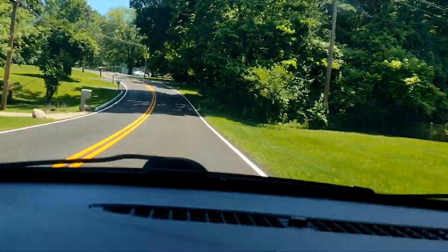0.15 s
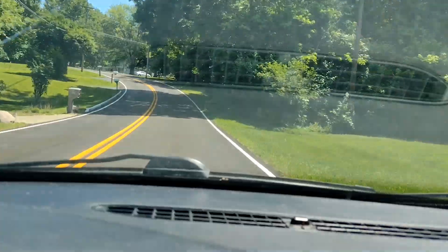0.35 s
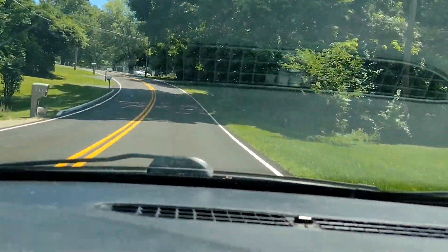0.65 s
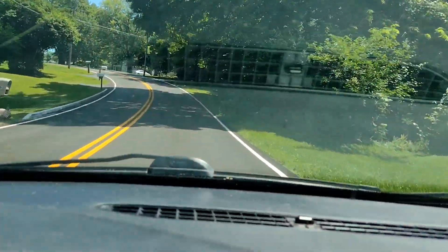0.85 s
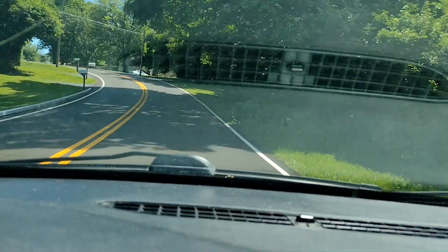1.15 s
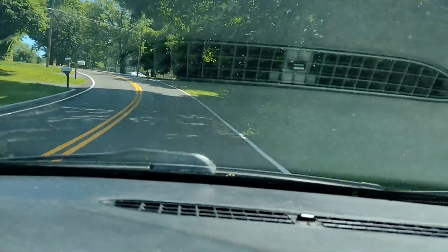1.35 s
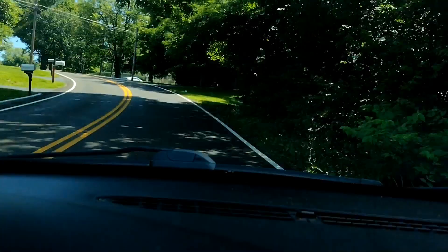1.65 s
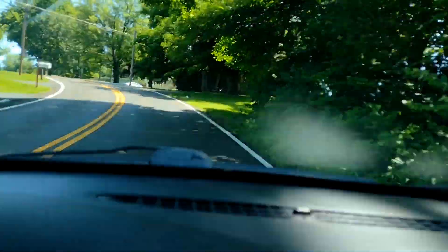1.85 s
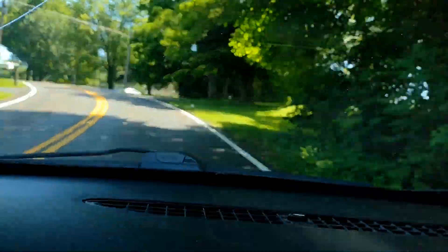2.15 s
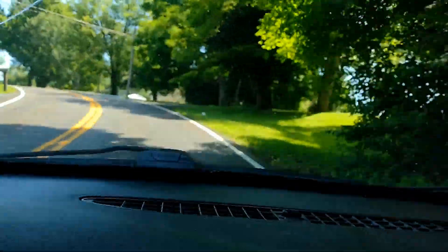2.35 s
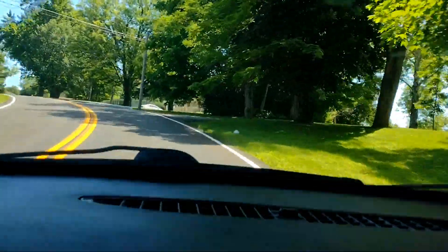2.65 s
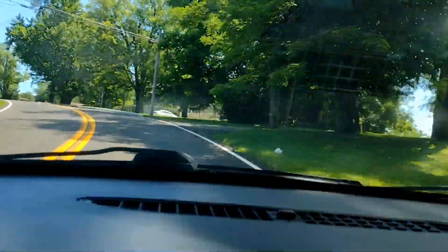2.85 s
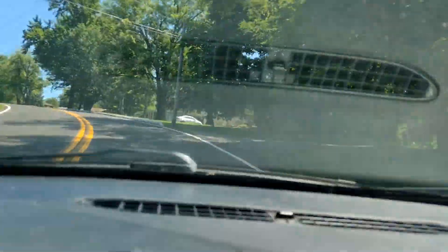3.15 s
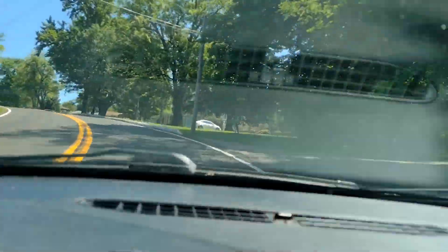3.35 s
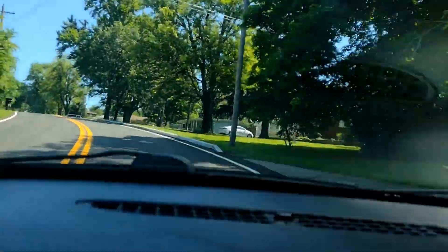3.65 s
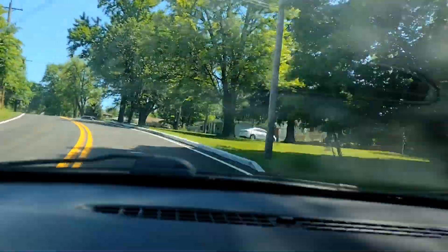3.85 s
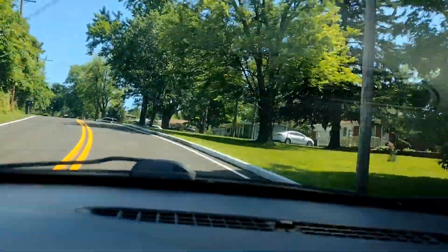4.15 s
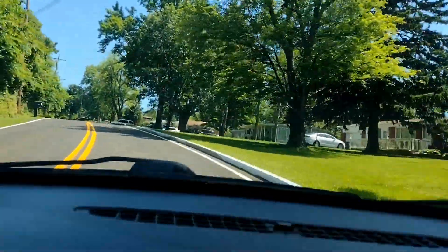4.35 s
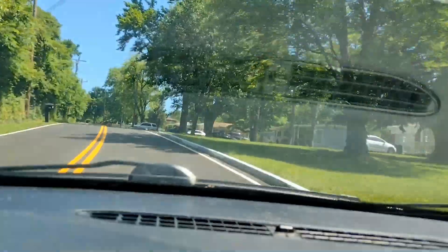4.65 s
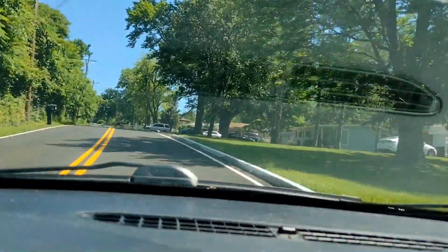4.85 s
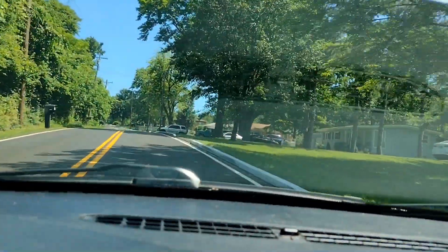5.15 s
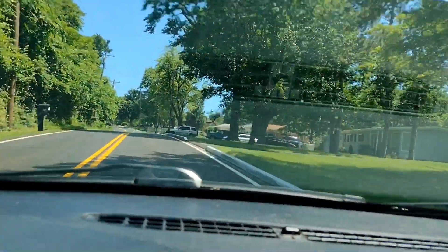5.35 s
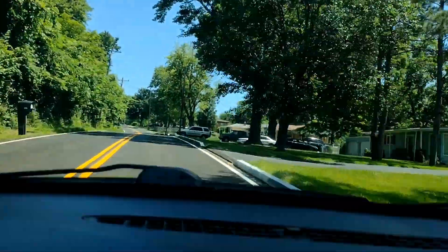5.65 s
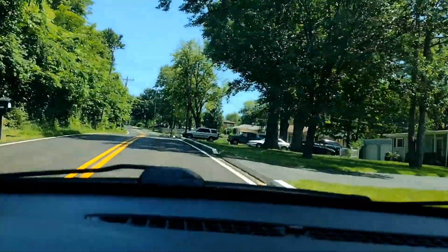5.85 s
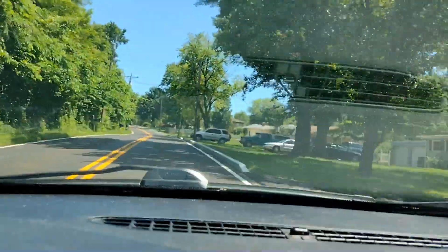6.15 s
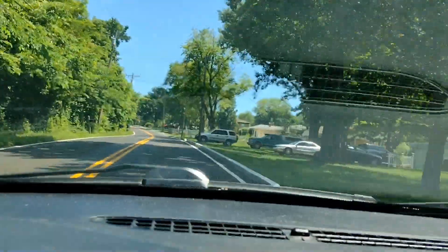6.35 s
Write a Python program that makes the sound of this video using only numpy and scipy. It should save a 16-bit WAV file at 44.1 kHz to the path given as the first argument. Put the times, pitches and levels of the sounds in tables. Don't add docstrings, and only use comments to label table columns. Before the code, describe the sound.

Inside a car, a deep turbo four-cylinder exhaust drones loudly, dips for a downshift blip, pulls long and rising, then lifts and upshifts lower.

```python
import sys
import numpy as np
from scipy import signal
from scipy.fft import rfft, irfft, next_fast_len
from scipy.io import wavfile
from scipy.ndimage import uniform_filter1d

SR = 44100
rng = np.random.default_rng(int(sys.argv[2]) if len(sys.argv) > 2 else 0)


def digitize_waveform(pressure):
    field = np.atleast_2d(pressure).T
    bounded = np.clip(field, -1, 1)
    quanta = np.round(bounded * 32767).astype(np.int16)
    wavfile.write(sys.argv[1], SR, quanta)


def attenuation_scalar(level_db):
    decades = np.asarray(level_db, float) / 20
    return 10 ** decades


N = 287091
IDLE_HZ = 63

# pitch_hz, level_db
HISS = [(2300, -17), (2640, -15.5), (3100, -2.5), (3760, -7), (4400, -9), (6000, -5.5), (8500, 1.5),
        (9600, -1), (10800, -4), (11800, -2.5), (12600, -2), (14000, 4), (14700, -1.5), (15700, 9.5)]
# pitch_hz, left_minus_right_db
TILT = [(60, 0), (200, -.3), (380, -2.5), (700, 1.6), (1290, -.2), (2380, .8), (4400, -1.8), (8120, -1.7),
        (11000, -.5), (15000, 3.5)]


def in_time(rows):
    s, *columns = np.transpose(rows)
    return [np.interp(np.arange(N) / SR, s, c) for c in columns]


def at_speed(rows, base_hz):
    speed_hz, *columns = np.transpose(rows)
    return [np.interp(base_hz, speed_hz, c) for c in columns]


def at_hz(points, hz):
    point_hz, point_db = np.transpose(points)
    return np.interp(np.log(hz + 1e-9), np.log(point_hz + 1), point_db)


def swell(start_s, full_s, fading_s, end_s):
    return np.interp(np.arange(N) / SR, np.sort([start_s, full_s, fading_s, end_s]), [0, 1, 1, 0])


def humps(rows):
    t = np.arange(N) / SR
    return sum(db * np.exp(-((t - s) / half_s) ** 2) for s, half_s, db in rows)


def bumps(peaks, hz):
    power = sum(attenuation_scalar(2 * db) / (1 + (2 * (hz - f) / width_hz) ** 2) ** 2 for f, width_hz, db in peaks)
    return 10 * np.log10(power + 1e-12)


def rms_one(x):
    return x / np.sqrt(np.mean(x ** 2) + 1e-20)


def drift(rate_hz):
    pole = np.exp(-80 * np.pi * rate_hz / SR)
    white = rng.standard_normal(N // 40 + 2002)
    slow = signal.lfilter([1], [1, -2 * pole, pole * pole], white)[2000:]
    return np.interp(np.arange(N) / 40, np.arange(len(slow)), rms_one(slow))


def noise(shape_db, low_hz, high_hz, patchy_db, count):
    # pitch_hz, side_minus_mid_db
    side_level = [(60, -13), (100, -14), (140, -23), (230, -9), (380, -5), (700, 1), (1290, -.6),
                  (2380, .6), (4400, .2), (8120, .8), (15000, .3)]
    size = next_fast_len(N)
    hz = np.arange(size // 2 + 1) * SR / size
    mid, side = rfft(rng.standard_normal((2, size))) * attenuation_scalar(shape_db(hz))
    side = side * attenuation_scalar(at_hz(side_level, hz))
    pair = np.array([mid + side, mid - side]) * attenuation_scalar(at_hz(TILT, hz) * np.array([[.5], [-.5]]))
    place = np.log(hz / low_hz + 1e-9) / np.log(high_hz / low_hz) * count
    edge = np.log(np.minimum(hz / low_hz, high_hz / (hz + 1)) + 1e-9)
    inside = np.sqrt(np.clip(edge / .2 + .5, 0, 1)) * (hz < 16500)
    out, together = 0, drift(2.6)
    for k in range(count + 1):
        mask = np.cos(np.pi / 2 * np.clip(np.clip(place, 0, count) - k, -1, 1)) * inside
        band = irfft(pair * mask, size)[:, :N]
        out = out + band * attenuation_scalar(patchy_db * (0.49 * together + drift(41.0)))
    return out / np.sqrt(np.mean(out.mean(axis=0) ** 2))


def order(phase, hz, level_db):
    # pitch_hz, left_lead_rad
    port_lead = [(60, .04), (85, .3), (125, .05), (170, .22), (250, .55), (275, 1.3), (335, .75),
                 (365, -.55), (420, -1.1), (700, -1.8)]
    spread_rad = at_hz(port_lead, hz) / 2
    ratio = attenuation_scalar(at_hz(TILT, hz) / 2)
    gain = np.sqrt(2) * attenuation_scalar(level_db) / np.cos(spread_rad)
    return gain * np.array([ratio * np.sin(phase + spread_rad), np.sin(phase - spread_rad) / ratio])


def engine_levels(base_hz):
    # time_s, effort_db against full pull
    effort = [(0, -1), (.95, -.5), (1.08, -2), (1.3, -7), (1.45, -0.8), (1.6, -1), (1.8, 0), (5.4, 0.5),
              (5.63, -1.5), (5.76, -8), (5.9, -4.5), (6.14, -6.5), (6.2, -0.6), (6.51, 0.5)]
    # base_hz, multiple_1_db, multiple_2_db, multiple_3_db, multiple_4_db
    pipe_tuning = [(61.2, -20.3, -9.2, -13, -28.5), (62.1, -21, -9.1, -14.2, -29),
                   (62.35, -21.7, -9.3, -17.5, -32.5), (65.5, -20.8, -8.8, -22, -38.5),
                   (68, -21, -9, -23, -39), (70.5, -22.5, -9, -32, -42), (82.5, -22, -8.6, -30.7, -34.5),
                   (84.3, -22.3, -8.3, -29.5, -29.5), (86.6, -27, -9.4, -28.3, -24.5),
                   (89.4, -39, -9.9, -30, -20.3), (90.2, -28.5, -9.9, -30, -19.5),
                   (92, -25.5, -10.2, -30.4, -18.8)]
    # base_hz, upper_orders_db, wastegate_rasp_db, body_roar_db
    by_speed = [(62.3, -59, -10, -45), (66.5, -52, -17, -42), (72.1, -38.5, 2, -52),
                (83.5, -41.5, -4.5, -41), (85.14, -36, 6.5, -39.5), (87.54, -33, 9, -37.5),
                (93.4, -33.5, 3, -35), (92.3, -31.5, 1.5, -35.5)]
    effort_shares = (0.16, 1.0, 0.86, 0.34)
    # start_s, full_s, fading_s, end_s
    free_rev = (1.472, 1.56, 1.7, 1.79)
    free_rev_loss_db = (5.2, 0.1, 2.2, 4.9, 6.4, 13, 3.6)
    (effort_db,) = in_time(effort)
    unloaded = swell(*free_rev)
    tuned_db = at_speed(pipe_tuning, base_hz) + at_speed(by_speed, base_hz)
    shares = (*effort_shares, 1.83, 0, 0.59)
    return [level_db + share * effort_db - loss_db * unloaded
            for level_db, share, loss_db in zip(tuned_db, shares, free_rev_loss_db)]


def exhaust(base_hz, turn, levels_db, uneven, upper_db, rasp_db):
    pipe_lag_rad = (.8, 0, 1.3, 3.3)
    # time_s, depth_db, half_width_s
    misfires = [
        (1.284, 14, .010),
        (5.72, 4, .015),
        (5.785, 11, .013),
        (6.14, 6, .012),
    ]
    # pitch_hz, pass_db
    response = [(40, -35), (135, -11), (210, -19), (300, -10), (390, -2), (450, -2.5), (540, -15.5),
                (600, -34), (680, -17.5), (740, -31), (800, -12.5), (835, -16.5), (872, -11), (950, -25),
                (1060, -13.5), (1160, -29)]
    # pitch_hz, drop_db
    half_drop = [(400, 0), (560, -6), (700, -20), (1000, -16), (1100, -16)]
    # pitch_hz, share
    rasp_share = [(420, 0), (480, 1), (580, 1), (680, 0)]
    skip_db = humps([(s, half_s, depth_db) for s, depth_db, half_s in misfires])
    out = 0
    for k, level_db in enumerate(levels_db, 1):
        shake_db = (.2 + 7.0 * uneven) * drift(25.0) - skip_db * (k < 4)
        lag_rad = pipe_lag_rad[k - 1] + .8 * uneven * drift(25.0)
        out = out + order(k * turn - lag_rad, k * base_hz, level_db + 0.58 + shake_db)
    for k in [.5, 1.5, 2.5, 3.5, *np.arange(4.5, 13.1, .5)]:
        hz = k * base_hz
        pass_db = at_hz(response, hz) + at_hz(rasp_share, hz) * rasp_db
        if k % 1:
            pass_db = pass_db + at_hz(half_drop, hz)
        pass_db = pass_db + np.minimum(uneven, .17) * 60 * np.exp(-((hz - 385) / 45) ** 2)
        wobble_rad = rng.uniform(0, 2 * np.pi) + (.25 + 2.0 * uneven) * drift(10.0)
        wander_db = (1.5 + 2.0 * (k > 6.6)) * drift(1.5)
        out = out + order(k * turn + wobble_rad, hz, upper_db + pass_db + wander_db)
    return out


def road_rumble():
    # pitch_hz, level_db
    rumble = [(12, -76), (20, -34.5), (118, -13.5), (149, -4), (172, -13.5), (198, -13), (222, -16),
              (290, -20), (340, -19), (600, -39), (780, -74), (1320, -120)]
    level_db = -27 + 0.86 * np.arange(N) / SR
    return attenuation_scalar(level_db) * noise(lambda hz: at_hz(rumble, hz), 20, 600, patchy_db=.7, count=4)


def cabin_boom(base_hz, lift, thump_db):
    level_db = -39 + 20 * lift + 0.34 * (base_hz - IDLE_HZ) + thump_db
    return attenuation_scalar(level_db) * noise(lambda hz: bumps([(138.6, 23, 0)], hz), 60, 300, patchy_db=1.0, count=1)


def body_roar(roar_db):
    # pitch_hz, level_db
    roar = [(320, -22), (550, -3.5), (713, -10.5), (837, -4), (956, -14.5), (1090, -3), (1340, -20.5),
            (1860, -12.5), (2170, -19), (2380, -10.5), (2700, -11), (3510, -33), (5940, -120)]
    return attenuation_scalar(roar_db - 3.5) * noise(lambda hz: at_hz(roar, hz), 487, 2680, patchy_db=2.5, count=4)


def air_levels(base_hz):
    # time_s, flow_db, boost_db against full
    air = [(0, -32.5, -19), (.25, -31, -10.5), (.75, -34, -7), (.96, -33.5, -5.5), (1.06, -37, -4),
           (1.19, -49, -8), (1.42, -67.5, -3), (1.49, -37, -17.5), (1.72, -34.5, -11), (1.95, -32.5, -14),
           (2.62, -29.5, -2.5), (3.3, -30, 2), (5.57, -29, -1), (5.7, -39, -1), (5.8, -38, -7),
           (6.1, -34.5, -28), (6.33, -31, -6.5), (6.51, -33, -7.5)]
    air_offset_db = (-4.5, -5.5, 0.5, -1.5)
    boost_shares = (0.65, 1.0, 0.074, 0)
    surge_shares = (.2, .2, 0.18, 0.52)
    # time_s, half_width_s, turbine_db
    surges = [
        (.88, 0.16, 10),
        (1.5, .04, 3),
        (1.68, 0.033, 4),
        (2.19, 0.033, 5),
        (2.33, 0.054, 4),
        (5.0, 0.27, -9),
        (5.89, 0.062, 6.5),
        (6.125, 0.023, 19),
    ]
    flow_db, boost_db = in_time(air)
    surge_db = humps(surges)
    levels_db = [flow_db + offset_db + share * boost_db + surge_share * surge_db
                 for offset_db, share, surge_share in zip(air_offset_db, boost_shares, surge_shares)]
    levels_db[-1] = levels_db[-1] + 0.3462 * (base_hz - IDLE_HZ)
    return levels_db


def airflow(turn, levels_db):
    # pitch_hz, width_hz, level_db
    throat = [(3170, 110, 0), (3830, 130, -2)]
    hiss_edges_hz = [2300, 4200, 6500, 11000, 18500]
    pulse = attenuation_scalar(0.23 * np.sin(2 * turn) + 0.35 * np.sin(turn) + 0.18 * np.sin(turn / 2))
    out = attenuation_scalar(levels_db[0] - 8.5) * noise(lambda hz: bumps(throat, hz), 2100, 4800, patchy_db=4.0, count=2)
    for low_hz, high_hz, level_db in zip(hiss_edges_hz, hiss_edges_hz[1:], levels_db):
        band = noise(lambda hz: at_hz(HISS, hz), low_hz, high_hz, patchy_db=1.93, count=2)
        out = out + attenuation_scalar(level_db - 1.47) * band
    return pulse * out


def duct_whistles(turbine_db):
    # pitch_hz, width_hz, level_db
    whistles = [(9050, 130, -10), (9250, 90, -12), (12165, 50, -10), (12445, 60, -10), (12828, 60, -7),
                (13080, 70, -12), (15222, 60, 0)]
    level_db = 1.3 * (turbine_db + 26) - 35.5
    return attenuation_scalar(level_db) * noise(lambda hz: bumps(whistles, hz), 6200, 20000, patchy_db=2.5, count=4)


def microphone_hiss():
    return attenuation_scalar(-59) * noise(lambda hz: 0 * hz, 2500, 18000, patchy_db=-1.5, count=2)


def valve_puffs():
    # time_s, level_db
    spits = [
        (1.287, -40),
        (5.906, -21.5),
        (6.125, -38),
    ]
    t = np.arange(N) / SR
    shape = sum(attenuation_scalar(db) * (t > s) * np.exp(-np.maximum(t - s, 0) / 0.0063) for s, db in spits)
    return shape * noise(lambda hz: at_hz(HISS, hz), 800, 18000, patchy_db=0, count=1)


def scene():
    # time_s, base_order_hz
    speed = [(0, 62.3), (1.0, 61.3), (1.07, 60.5), (1.16, 69.5), (1.25, 71.7), (1.39, 70.8), (1.55, 89.8),
             (1.62, 91.0), (1.8, 82.0), (3.2, 84.6), (5.3, 91.5), (5.7, 92.2), (5.76, 89.9), (6.0, 88.2),
             (6.15, 83.3), (6.25, 62.5), (6.31, 66.3), (6.51, 64.9)]
    # start_s, full_s, fading_s, end_s, roughness
    lifts = [
        (1.05, 1.2, 1.55, 1.8, .11),
        (5.55, 5.75, 6.15, 6.25, .18),
    ]
    # time_s, half_width_s, boom_db, upper_orders_and_roar_db
    jolts = [
        (1.24, 0.12, 20.5, 7),
        (1.64, 0.04, 14, 3),
        (3.75, 0.57, 4, 2.5),
        (5.13, .1, 11.5, -1.3),
        (5.72, .04, 6, 2.5),
        (5.78, 0.032, 11.5, 6.5),
        (5.84, 0.045, -2.5, 4.5),
        (6.17, 0.042, 11, 9),
    ]
    (base_hz,) = in_time(speed)
    turn = 1 + 2 * np.pi * np.cumsum(base_hz) / SR
    *levels_db, upper_db, rasp_db, roar_db = engine_levels(base_hz)
    lift = sum(rough * swell(*times) for *times, rough in lifts)
    levels_db[0] = levels_db[0] + swell(*lifts[-1][:-1]) * np.maximum(-25.5 - levels_db[0], 0)
    thump_db = humps([(s, half_s, boom_db) for s, half_s, boom_db, _ in jolts])
    bark_db = humps([(s, half_s, upper) for s, half_s, _, upper in jolts])
    air_db = air_levels(base_hz)

    mix = exhaust(base_hz, turn, levels_db, .04 + lift, upper_db + bark_db, rasp_db)
    mix = mix + road_rumble() + cabin_boom(base_hz, lift, thump_db) + body_roar(roar_db + bark_db)
    mix = mix + airflow(turn, air_db) + duct_whistles(air_db[-1]) + microphone_hiss()
    return mix + valve_puffs()


def top_cut(x):
    return signal.sosfilt(signal.butter(12, 17030, fs=SR, output="sos"), x)


def record(dry):
    hold_db, squeeze = -9, .5
    power = np.mean(dry, axis=0) ** 2
    quick, slow = (uniform_filter1d(power, size=n) for n in (700, 6000))
    loud = slow > attenuation_scalar(2 * (hold_db - 2))
    active = uniform_filter1d(loud * 1., size=2000)
    evened = dry * (slow / (quick + 1e-9)) ** (squeeze / 2 * active)
    rounded = evened / (1 + np.abs(evened / .97) ** 8) ** (1 / 8)
    low_pass = signal.ellip(12, .5, 60, 15740, fs=SR, output="sos")
    return top_cut(signal.sosfilt(low_pass, rounded))


dry = scene()
out = record(dry)
digitize_waveform(out)
```